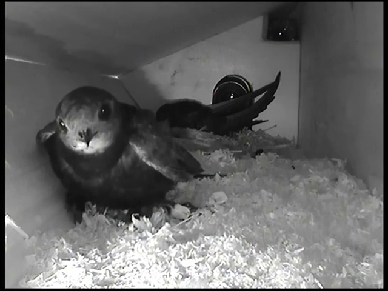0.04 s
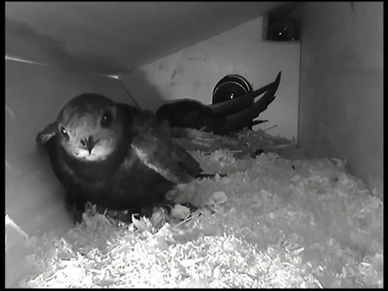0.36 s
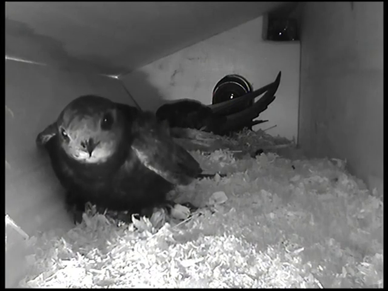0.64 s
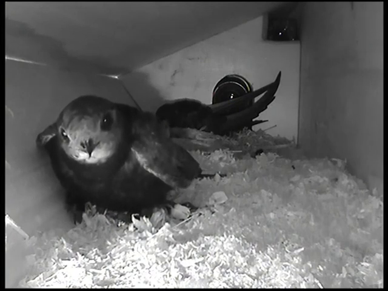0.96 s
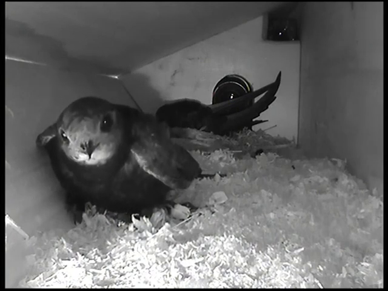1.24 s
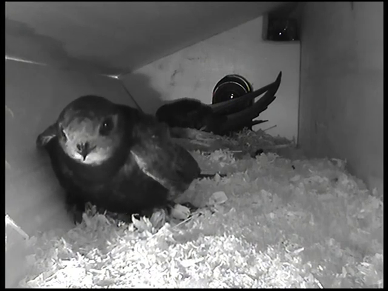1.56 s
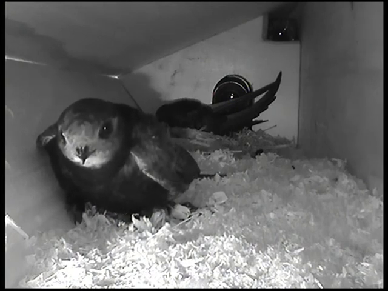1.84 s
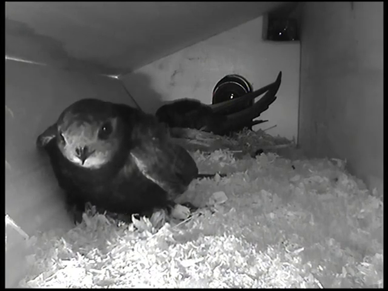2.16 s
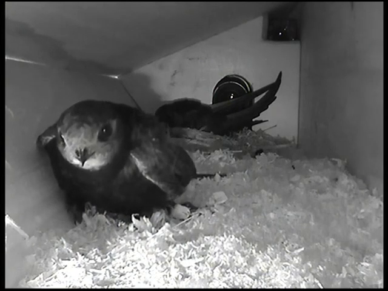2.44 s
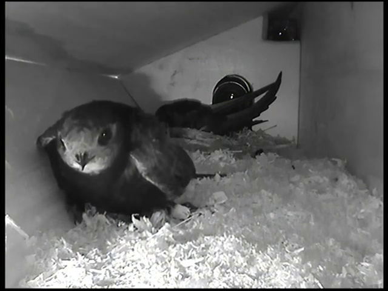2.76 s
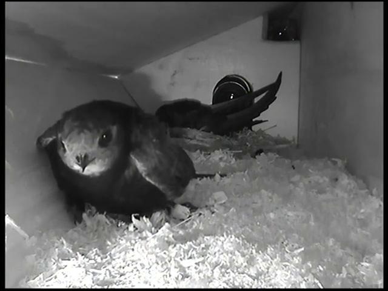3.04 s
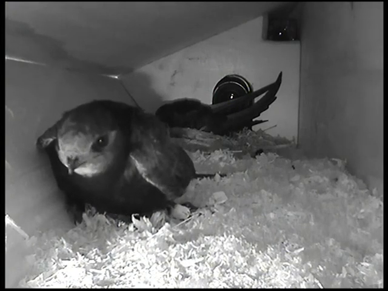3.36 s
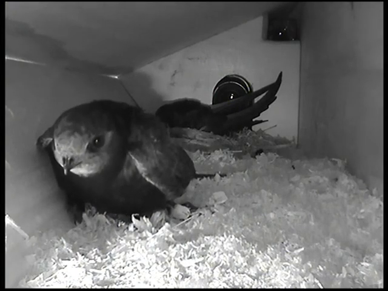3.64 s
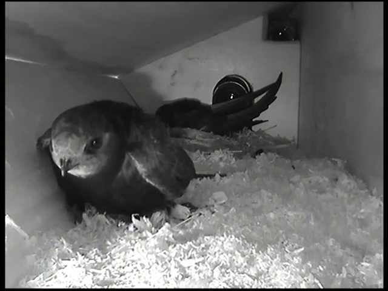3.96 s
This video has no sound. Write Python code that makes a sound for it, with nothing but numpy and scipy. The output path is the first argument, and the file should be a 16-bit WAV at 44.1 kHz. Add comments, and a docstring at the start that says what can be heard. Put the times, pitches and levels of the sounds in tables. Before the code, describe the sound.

Three raspy bird caws sound outside a nest box, with distant twittering, hiss and electrical buzz.

```python
"""Harsh calls at a nest box

A crow-like bird gives three falling calls just outside a wooden nest box: each is a harmonic tone,
modulated by a slower rattle, that breaks into a rasp. Small birds whistle, twitter and scream farther
off. The box camera's microphone feeds the right channel, with steady hiss, a buzz from the picture
signal, mains hum and a thin whine; the left channel is nearly silent."""
import sys
import numpy as np
from scipy import signal
from scipy.fft import rfft, irfft, next_fast_len
from scipy.io import wavfile
from scipy.ndimage import uniform_filter1d

SR = 44100
rng = np.random.default_rng(int(sys.argv[2]) if len(sys.argv) > 2 else 0)


def output_pcm(signal):
    """Save a mono or channel-first signal as 16-bit PCM at the path in sys.argv[1].

    Samples are clipped to [-1, 1] before scaling.
    """
    pcm = np.clip(np.atleast_2d(signal).T, -1, 1) * 32767
    wavfile.write(sys.argv[1], SR, np.round(pcm).astype(np.int16))


N = 176400

# All levels are relative, ahead of the microphone gain.
# noise spectrum of the air and microphone: f/Hz, level/dB
HISS_SPECTRUM = [(30, -31), (60, -11), (90, -3), (130, -4), (200, -2), (330, -3), (560, -5), (960, -3.5),
                 (1250, -6.5), (1650, -8), (2200, -14.5), (3200, -15.5), (4700, -21.5), (5700, -22),
                 (7600, -26), (8400, -28), (13200, -28.5)]
# noise spectrum of the unused left input: f/Hz, level/dB
IDLE_SPECTRUM = [(20, 7), (60, -11), (100, 6), (170, -17.5), (330, -18.5), (1000, -18), (7300, -20),
                 (7950, -1), (8600, -16), (11000, -21.5), (11600, -45)]
# resting value of the left and right inputs: offset/full scale
DC_OFFSET = [
    [-.0209],
    [-.0228],
]
# partials of the mains hum: f/Hz, level/dB
HUM_PARTIALS = [(100, -72.5), (150, -73)]
# far whistles: onset t/s, duration/s, start f/Hz, middle f/Hz, end f/Hz, level/dB
WHISTLE_NOTES = [(.005, .02, 3450, 3330, 3200, -63), (.03, .025, 3500, 3650, 3600, -61),
                 (.18, .12, 3150, 3150, 3120, -71), (.525, .05, 4900, 4820, 4500, -63),
                 (.585, .03, 3450, 3250, 3150, -65), (.795, .04, 7650, 7950, 7600, -67),
                 (1.02, .05, 4000, 4050, 4050, -69), (1.95, .035, 4200, 4300, 4380, -56),
                 (2.887, .06, 3850, 4030, 4050, -60), (3.003, .056, 3990, 4060, 4020, -60),
                 (3.135, .05, 4080, 4100, 4020, -63), (3.275, .028, 3990, 4020, 4030, -65),
                 (3.333, .052, 4010, 4040, 4040, -56.5), (3.573, .042, 6160, 6250, 6220, -57.5),
                 (3.635, .04, 6200, 6270, 6270, -64), (3.665, .022, 4150, 4280, 4330, -59),
                 (3.693, .03, 5030, 5080, 4980, -54), (3.735, .026, 5060, 5080, 5040, -59)]
# far screams: onset t/s, duration/s, start f/Hz, middle f/Hz, end f/Hz, level/dB
SCREAM_NOTES = [(0.433, 0.17, 3500, 4590, 3010, -69), (1.957, 0.18, 4000, 4600, 4200, -53),
                (2.226, 0.077, 3600, 3370, 3458, -61), (3.642, 0.13, 3100, 4360, 3360, -55),
                (3.737, 0.07, 4500, 4600, 4370, -54)]
# upward flicks of the twitter: onset t/s, centre f/Hz, level/dB
TWITTER_FLICKS = [(1.292, 4570, -63), (1.313, 4550, -65), (1.367, 4260, -59), (1.390, 4540, -59),
                  (1.409, 4540, -62), (1.463, 4370, -65), (1.48, 4380, -54), (1.504, 4730, -65),
                  (1.523, 4130, -64), (1.625, 4080, -67), (3.533, 5170, -57), (3.555, 5270, -55.5),
                  (3.927, 5300, -51.5), (3.950, 5300, -57)]
# reverberation of the yard: f/Hz, T60/s
YARD_DECAY = [(500, 0.23), (1600, 0.55), (3500, 0.74), (5000, 0.68), (9000, 0.083)]
# ring of the box: f/Hz, T60/s
BOX_DECAY = [(700, 0.023), (1600, 0.12), (3000, 0.14), (5000, 0.026), (9000, 0.019)]
# first reflections inside the box: delay t/s, level/dB
WALL_REFLECTIONS = [(.00125, -14.5), (.0019, -23.5)]
# envelopes, one table per call: t/s, level/dB of harmonics 1, 2 and 3
HARMONIC_LEVELS = [
    [(1.828, -56, -56, -61), (1.834, -39, -46, -45), (1.842, -37, -41.5, -32), (1.876, -29.5, -34, -28),
     (1.896, -28.5, -24.5, -43), (1.946, -42.5, -36, -55), (1.958, -57, -68, -51)],
    [(2.032, -58, -40, -50), (2.04, -37, -42, -36.5), (2.064, -34, -31, -29), (2.096, -31, -31.5, -43),
     (2.108, -32.5, -23.5, -46), (2.152, -42.5, -34, -61), (2.162, -42, -57, -58)],
    [(3.779, -50, -49, -64), (3.789, -37.5, -45, -37), (3.823, -34, -36.5, -31.5), (3.837, -28.5, -27, -41),
     (3.849, -32, -28, -46), (3.861, -33, -29, -49), (3.887, -42.5, -36, -51), (3.903, -58, -51, -59)],
]
# harmonics 4 to 7 against the third: level/dB
UPPER_HARMONICS = [-13.5, -33, -35.5, -33.5]
# fundamental, one table per call: t/s, f/Hz
PITCH_CONTOURS = [
    [(1.830, 1100), (1.840, 1470), (1.849, 1590), (1.876, 1596), (1.894, 1630), (1.908, 1540),
     (1.926, 1400), (1.943, 1100), (1.955, 850)],
    [(2.034, 1300), (2.045, 1585), (2.076, 1595), (2.093, 1770), (2.103, 1740), (2.117, 1540),
     (2.134, 1380), (2.148, 1110), (2.160, 900)],
    [(3.781, 1230), (3.790, 1480), (3.800, 1550), (3.822, 1570), (3.845, 1620), (3.858, 1500),
     (3.876, 1380), (3.890, 1080), (3.900, 880)],
]
# rattle within a call: t/s from onset, base rate f/Hz, roughness (0-1), modulation depth (0-1)
RATTLE_CONTOUR = [(0, 292, 0.77, .7), (.02, 286.3, 0.21, 0.74), (.045, 286, 0.11, 0.74),
                  (.065, 238, 0.27, 0.35), (.09, 190, .3, .5), (.11, 170.8, .65, 0.7), (.13, 163, 0.9, 0.3)]
# factor on the base rattle rate, one per call
RATTLE_SPEEDS = [1.0, 1, 0.89]
# spectrum of the breath noise: f/Hz, level/dB
BREATH_SPECTRUM = [(500, -31), (1000, -11), (1600, -14), (2500, -24), (3500, 27), (4800, 11), (6000, -21),
                   (7000, 8), (8200, -7), (11500, -14), (14000, -36)]
# colour of throat and box: f/Hz, level/dB
THROAT_RESPONSE = [(700, -10), (1200, -3), (1600, -4), (2100, -1.5), (2600, -6.5), (3200, -4.5), (3750, 11),
                   (4150, 15.5), (4900, 10), (5300, 10.5), (5800, 0.5), (6700, -2), (7800, 6.5),
                   (11000, 11)]


def amp(db):
    """Amplitude ratio of a level in decibels."""
    return 10 ** (np.asarray(db) / 20)


def unit(x):
    """Normalisation to rms 1."""
    return x / np.sqrt(np.mean(abs(x) ** 2) + 1e-20)


def read_spectrum(points, hz):
    """Interpolation on a logarithmic frequency axis."""
    f, value = np.transpose(points)
    return np.interp(np.log(hz + 1), np.log(f + 1), value)


def contours(rows, t):
    """Linear interpolation of each column of a time table."""
    times, *columns = np.transpose(rows)
    return [np.interp(t, times, column) for column in columns]


def add(mix, start_s, sound):
    """Superposition of a delayed sound on a mix."""
    at = round(start_s * SR)
    part = mix[at:at + len(sound)]
    part += sound[:len(part)]


def colour(x, points):
    """Filtering as multiplication of the spectrum by a response (f/Hz, level/dB)."""
    size = next_fast_len(len(x))
    gain = amp(read_spectrum(points, np.fft.rfftfreq(size, 1 / SR)))
    return irfft(rfft(x, size) * gain, size)[:len(x)]


def wander(size, bandwidth_hz):
    """Low-pass noise: a smooth random fluctuation of rms near 1."""
    lowpass = np.exp(-.5 * (np.fft.rfftfreq(SR, 1 / SR) / bandwidth_hz) ** 2)
    return unit(irfft(rfft(rng.standard_normal(SR)) * lowpass))[:size]


def phase_of(hz):
    """Phase as the time integral of frequency."""
    return 2 * np.pi * np.cumsum(hz) / SR


def fade(t, attack_s, release_s):
    """Trapezoidal amplitude envelope."""
    return np.clip(t / attack_s, 0, 1) * np.clip((t[-1] - t) / release_s, 0, 1)


def glide(length_s, start_hz, middle_hz, end_hz):
    """Time and phase of a parabolic sweep through three frequencies."""
    t = np.arange(0, length_s, 1 / SR)
    parabola = np.polyfit([0, .5, 1], [start_hz, middle_hz, end_hz], 2)
    return t, phase_of(np.polyval(parabola, t / length_s))


def hoarse(phase, width_hz):
    """Random quadrature modulation spreads a tone into a narrow band of noise."""
    size = len(phase)
    return unit(wander(size, width_hz) * np.cos(phase) + wander(size, width_hz) * np.sin(phase))


def reverberation(x, decay):
    """A diffuse field: convolution with noise whose bands decay exponentially, each at its own rate."""
    hz, t, bands = signal.stft(rng.standard_normal(SR // 2), SR, nperseg=256)
    t60 = read_spectrum(decay, hz)[:, None]
    tail = signal.istft(bands * amp(-60 * t / t60), SR, nperseg=256)[1]
    tail *= np.minimum(np.arange(len(tail)) / 128, 1)
    return signal.fftconvolve(x, tail / np.linalg.norm(tail))[:N]


def hiss(level_db=-53, patch_db=1.62):
    """Broadband noise of air and microphone, its spectral density drifting slightly in patches."""
    hz, _, bands = signal.stft(rng.standard_normal(N), SR, nperseg=2048, noverlap=1536)
    patches = uniform_filter1d(rng.standard_normal(bands.shape), size=14, axis=0)
    patches = unit(uniform_filter1d(patches, size=8, axis=1))
    bands *= amp(read_spectrum(HISS_SPECTRUM, hz)[:, None] + patch_db * patches)
    return amp(level_db) * unit(signal.istft(bands, nperseg=2048, noverlap=1536)[1][:N])


def camera(field_hz=49.999, first_pulse_s=.0105, whine_hz=8000):
    """Electrical interference: one pulse per picture field makes a buzz; hum and whine are sinusoids."""
    t = np.arange(N) / SR
    field, age = np.divmod(t - first_pulse_s + 1 / field_hz, 1 / field_hz)
    strengths = 1 + 0.083 * rng.standard_normal(int(field[-1]) + 1)
    spike, step = amp(-47) * (age < .00032), amp(-47) * (age < .0016)
    pulses = strengths[field.astype(int)] * (spike + step)
    buzz = colour(pulses - pulses.mean(), [(50, -7), (2000, 0), (6000, -2.5), (13000, 1)])
    hum = sum(amp(db) * unit(np.cos(2 * np.pi * hz * (t - first_pulse_s))) for hz, db in HUM_PARTIALS)
    whine = amp(-74.7) * unit(np.sin(2 * np.pi * whine_hz * t))
    return buzz + hum + whine


def whistles(waver_hz=58.5):
    """Thin gliding tones waver by random frequency modulation."""
    out = np.zeros(N)
    for start, *shape, db in WHISTLE_NOTES:
        t, phase = glide(*shape)
        waver = phase_of(waver_hz * wander(len(t), 100))
        add(out, start, amp(db) * unit(np.sin(phase + waver)) * fade(t, 0.0027, 0.0093))
    return out


def screams():
    """Narrow-band noise with a gliding centre frequency is heard as a hoarse scream."""
    out = np.zeros(N)
    for start, *shape, db in SCREAM_NOTES:
        t, phase = glide(*shape)
        add(out, start, amp(db) * hoarse(phase, width_hz=220) * fade(t, 0.019, 0.0067))
    return out


def twitter(flick_s=.013, rise_hz=1000):
    """Brief linear chirps of narrow-band noise are heard as upward flicks."""
    out = np.zeros(N)
    for start, hz, db in TWITTER_FLICKS:
        t, phase = glide(flick_s, hz - rise_hz / 2, hz, hz + rise_hz / 2)
        add(out, start, amp(db) * hoarse(phase, width_hz=400) * fade(t, 0.0025, 0.0062))
    return out


def nest_box(x, ring_db=-15):
    """Reflection at the wooden walls adds early echoes and a short ring to the direct sound."""
    out = x + amp(ring_db) * reverberation(x, BOX_DECAY)
    for delay, db in WALL_REFLECTIONS:
        add(out, delay, amp(db) * x)
    return out


def harsh_call(levels, pitch, speed):
    """Amplitude and phase modulation by a rattle give each harmonic sidebands; jitter makes them rasp."""
    start, end = levels[0][0], levels[-1][0]
    t = np.arange(0, end - start, 1 / SR)
    size = len(t)
    hz, = contours(pitch, start + t)
    first_db, second_db, third_db = contours(levels, start + t)
    rate, roughness, depth = contours(RATTLE_CONTOUR, t)
    rattle = phase_of(speed * rate * (1 + 0.13 * roughness * wander(size, 106.5)))
    jitter_hz = 118 * roughness * wander(size, 450)
    phase = phase_of(hz + jitter_hz) + 0.5 * np.sin(rattle) - 0.073 * np.sin(2 * rattle)
    harmonics_db = [first_db, second_db, third_db] + [third_db + db for db in UPPER_HARMONICS]
    voice = np.zeros(size)
    for k, db in enumerate(harmonics_db):
        # each higher harmonic is chopped less deeply and peaks later in the rattle cycle
        chop = unit(1 + depth * 0.77 ** k * np.cos(rattle - 0.5 * k))
        shimmer = 1 + 0.34 * roughness * wander(size, 450)
        carrier = np.cos((k + 1) * phase + 2 * np.pi * rng.random())
        harmonic = colour(amp(db) * chop * shimmer * carrier, THROAT_RESPONSE)
        voice += unit(harmonic) * np.sqrt(np.mean(amp(db) ** 2))  # the envelope alone sets the rms
    air = unit(colour(rng.standard_normal(SR), BREATH_SPECTRUM))[:size]
    air *= unit(1 + depth * np.cos(rattle))
    breath = amp(-18.5) * air * np.sqrt(roughness) * (amp(first_db) + amp(second_db) + amp(third_db))
    return (voice + breath) * fade(t, 0.0009, 0.012)


def scene(mic_gain_db=6, crosstalk_db=-71.5):
    """Superposition at one microphone on the right channel; the left holds idle noise and crosstalk."""
    far = whistles() + screams() + twitter()
    near = np.zeros(N)
    for levels, pitch, speed in zip(HARMONIC_LEVELS, PITCH_CONTOURS, RATTLE_SPEEDS):
        add(near, levels[0][0], harsh_call(levels, pitch, speed))
    birds = nest_box(near) + far + reverberation(amp(-29) * near + amp(-7.5) * far, YARD_DECAY)
    mic = amp(mic_gain_db) * (birds + hiss() + camera())
    idle = amp(-70.5) * unit(colour(rng.standard_normal(N), IDLE_SPECTRUM))
    return np.array([idle + amp(crosstalk_db) * mic, mic])


def record(dry, cutoff_hz=13300):
    """A low-pass filter limits the bandwidth; a DC offset holds both inputs slightly below zero."""
    lowpass = signal.firwin(511, cutoff_hz, window=("kaiser", 9), fs=SR)
    return signal.oaconvolve(dry, lowpass[None], "same") + DC_OFFSET


dry = scene()
out = record(dry)
output_pcm(out)
```